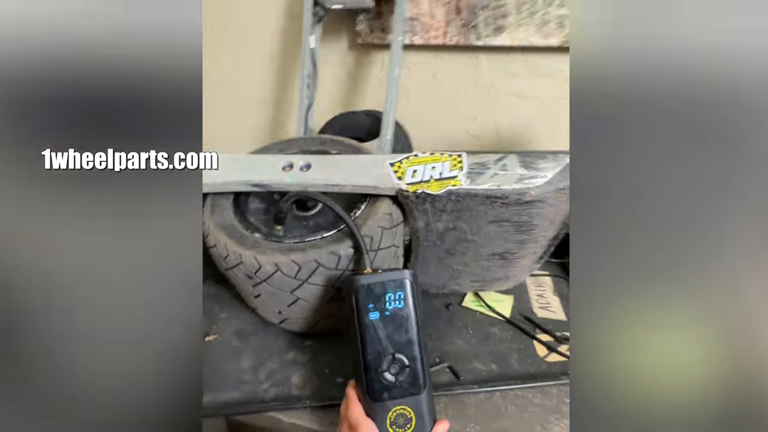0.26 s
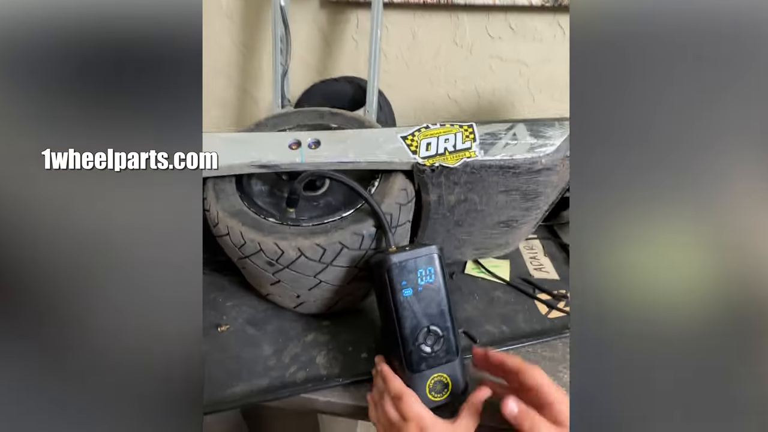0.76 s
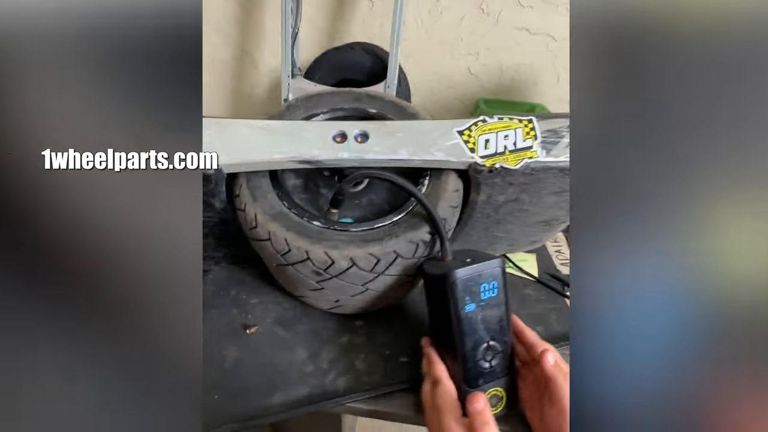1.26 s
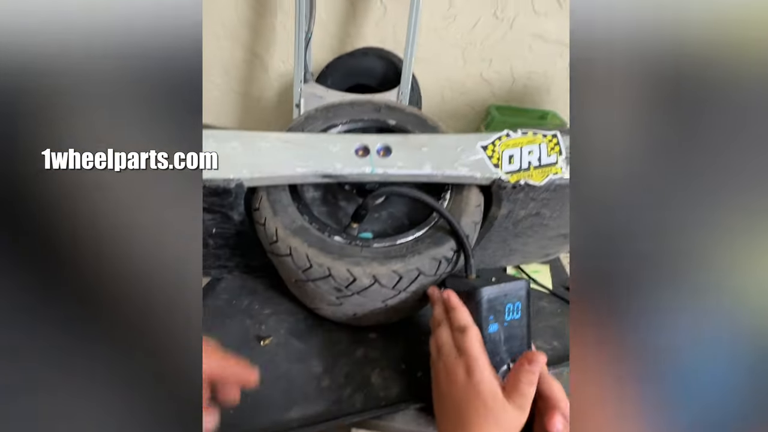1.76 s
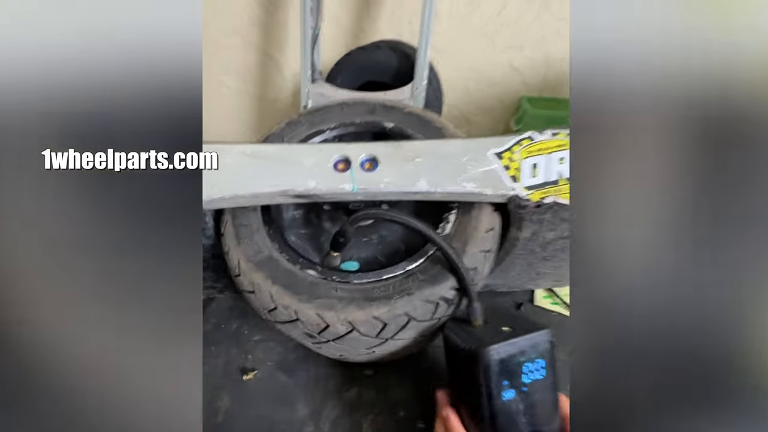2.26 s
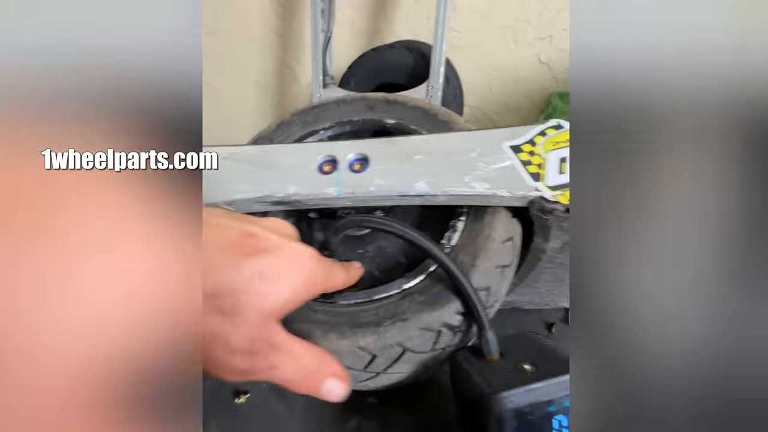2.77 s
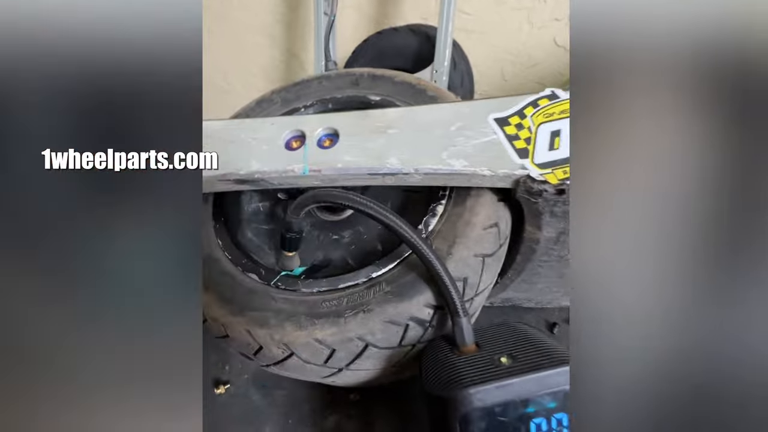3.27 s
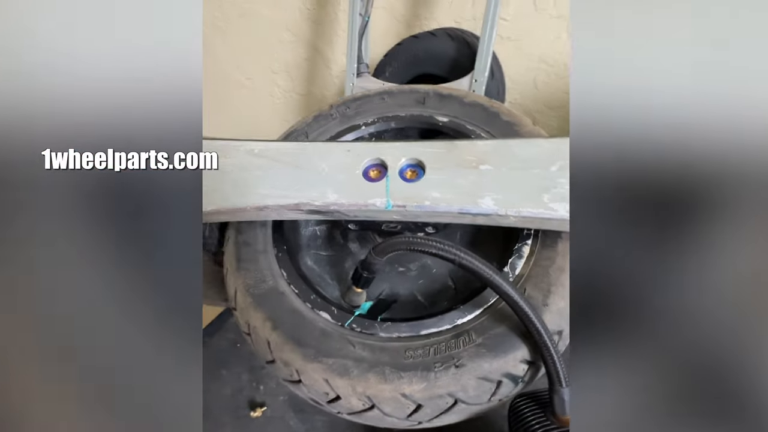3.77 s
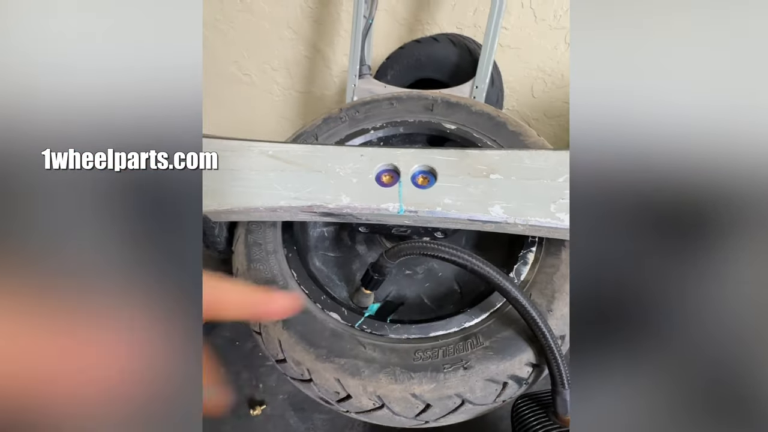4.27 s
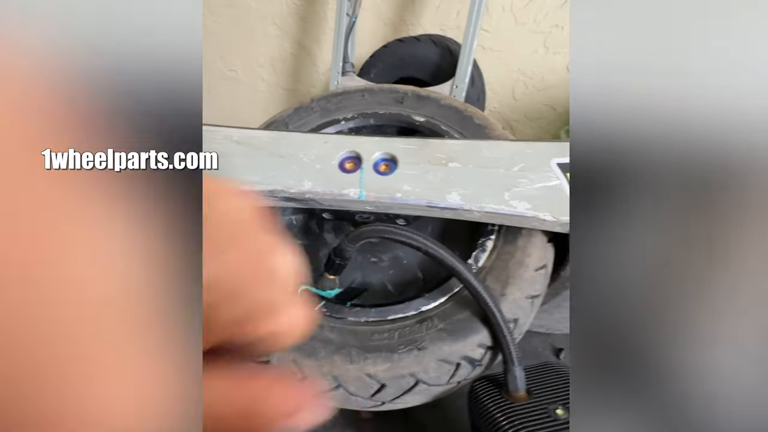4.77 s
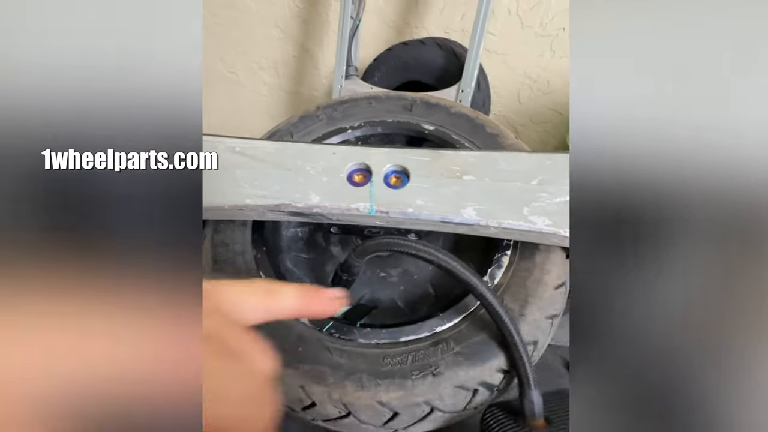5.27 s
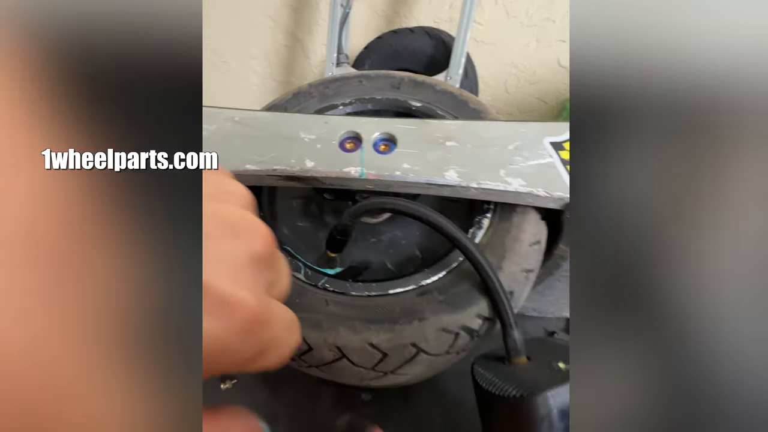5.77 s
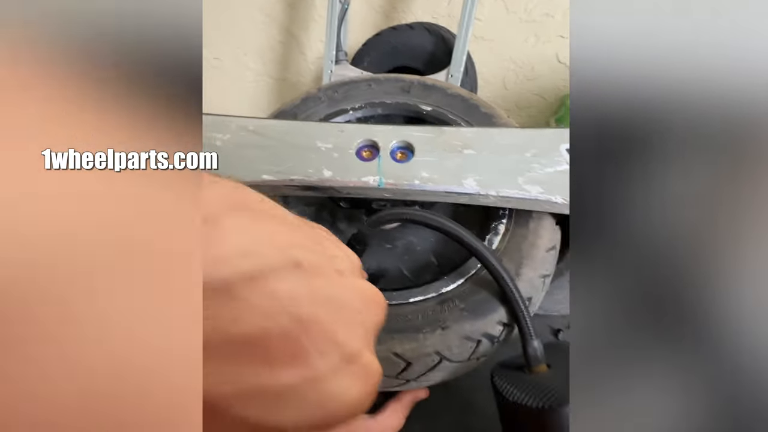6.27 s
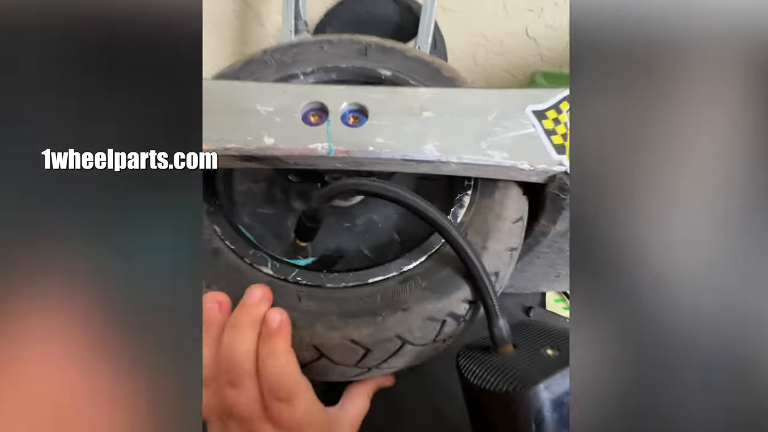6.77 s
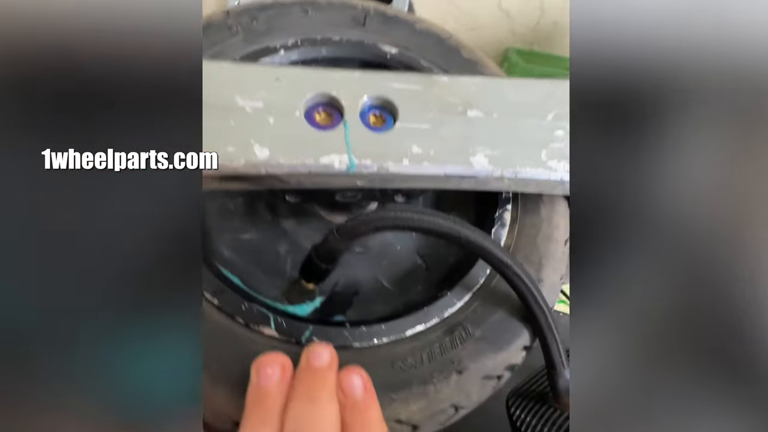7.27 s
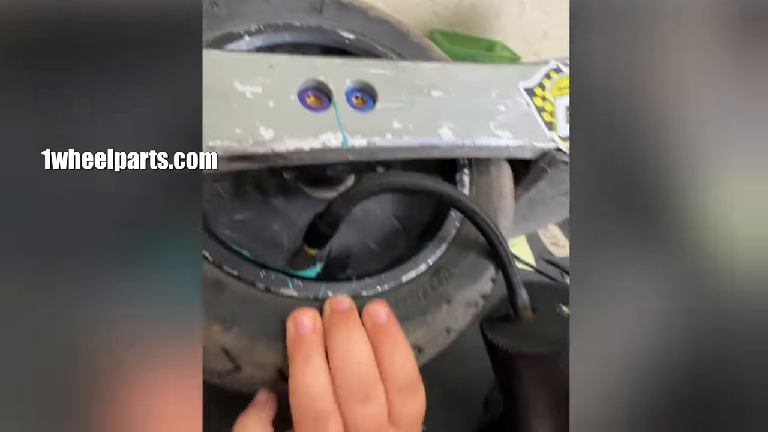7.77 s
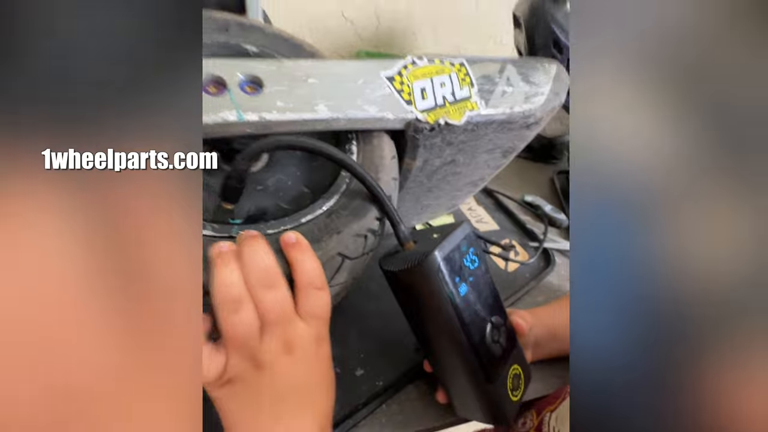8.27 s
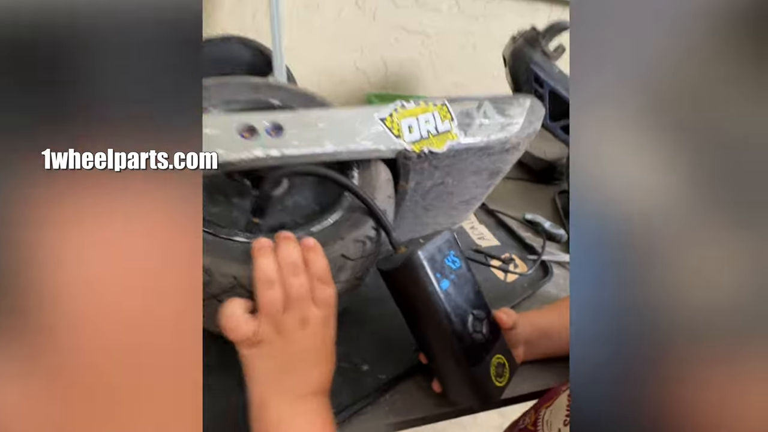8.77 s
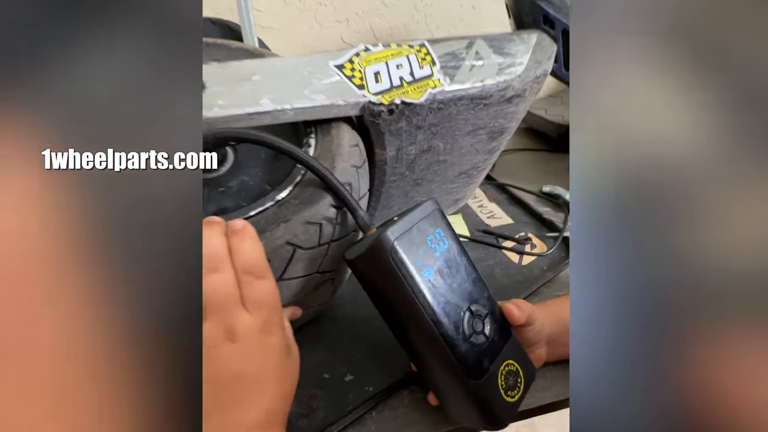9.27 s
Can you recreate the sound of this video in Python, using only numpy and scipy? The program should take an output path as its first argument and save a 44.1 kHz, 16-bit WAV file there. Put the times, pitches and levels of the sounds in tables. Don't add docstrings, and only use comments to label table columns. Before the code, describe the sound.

A small hand-held piston tyre pump runs throughout, close to a phone microphone indoors, already at full speed at the start and still going at the end, about 9.5 seconds. Some 45 strokes a second fuse into a coarse, buzzing rattle, with a strong nasal gear whine around 1.8 kHz, a fainter whine an octave higher, plastic housing ring near 1 kHz and bright valve hiss pulsing with each stroke. From 0 to 2.6 it hums and drums into the workbench, with faint scuffs around 1.4 and 2; then it lifts and the low drumming thins. It rests again from 3.7 to 4.9, deepest after 4.3, with a dull bump near 4.5. Afterwards it stays in the hand, whine and hiss shifting gently as it turns, brief airy glints passing around 6 to 8.3. Pitch sags only slightly as pressure builds.

```python
import sys
import numpy as np
from scipy import signal
from scipy.fft import rfft, irfft, next_fast_len
from scipy.io import wavfile

SR = 44100
rng = np.random.default_rng(int(sys.argv[2]) if len(sys.argv) > 2 else 0)


def unload_audio(sound):
    columns = np.transpose(np.atleast_2d(sound))
    steps = np.round(np.clip(columns, -1, 1) * 32767)
    wavfile.write(sys.argv[1], SR, steps.astype(np.int16))


def field_ratio(decibels):
    return 10 ** (np.asarray(decibels, dtype=float) / 20)


N = 419391

# time in seconds, speed in strokes per second.
CRANK_SPEED = [(0, 46.14), (1, 45.962), (1.5, 45.818), (2, 45.745), (2.5, 45.644), (3, 45.477),
               (3.5, 45.448), (4, 45.396), (4.5, 45.16), (5, 45.188), (5.5, 45.047), (6, 45.032),
               (6.5, 44.95), (7, 44.793), (8, 44.715), (8.5, 44.622), (9, 44.594), (9.51, 44.495)]
# multiple of crank speed, level in dB.
STROKE_HUM = [(1, -36), (2, -16), (3, -16.5), (4, -6), (5, -47.5), (6, -7.5), (7, -27), (8, -5.5),
              (9, -7.5), (10, 1.5), (11, -1), (12, -4.5), (13, -15.5)]
# multiple of crank speed, level in dB.
BENCH_HUM = [(3, -2), (5, -2.5)]
# motor turns, crank turns (both rounded), level in dB.
SHAFT_WOBBLE = [(1, -4.5, -76), (1, 3, -68), (1, 27, -86), (1, 6.5, -72), (1, -4, -82), (2, 6.5, -70),
                (3, 3, -62), (4, 4.5, -101)]

# centre in Hz, width in Hz, share of scraping hiss in dB.
PANEL_MODES = [(699, 140, -1), (826, 258, 3.5), (973, 120, 5.5), (1012, 200, -9.5)]
CYLINDER_MODES = [(1417, 580, 0), (1557, 92, 0.0051)]
MESH_MODES = [(1704, 220, -20), (1782, 350, -7.5)]
SECOND_MODES = [(3496, 630, 2.1), (3830, 520, 1.6)]
CAN_MODES = [(10300, 360, 1), (10780, 440, 3)]

# frequency in Hz, level in dB per Hz.
HISS_COLOUR = [(1500, -3), (1950, -12), (2300, -8.5), (3200, -14.5), (4100, -21), (4700, -20), (5500, -23),
               (6400, -17), (8500, -14.5), (9600, -14), (11000, -3.5), (11800, -4), (15000, -2.5),
               (16500, -18)]
BODY_COLOUR = [(30, -60), (60, -58), (150, -44), (300, -20), (500, -11), (650, -3), (1200, 0), (2000, -5.5),
               (2600, -19)]
# low edge in Hz, high edge in Hz.
HISS_EDGES = [(1700, 3700), (3700, 5600), (5600, 9800), (9800, 16500)]
# one width in Hz each, then one level against the hiss in dB each.
CAVITY_WIDTHS = [580, 230, 930]
CAVITY_SHARES = [-8, -9.5, -8]
# multiple of tooth rate, level in dB.
TOOTH_STREAKS = [(2.45, -66), (2.8, -67), (3, -67), (4, -67), (5, -66)]

# time in seconds, level in dB, length in seconds.
BUMPS = [
    (1.4, -71, .04),
    (1.98, -67, .03),
    (2.5, -66, .07),
    (3.7, -68, .03),
    (4.484, -56, 0.032),
    (4.8, -70, 0.031),
]
# start in seconds, end in seconds, deep drumming in dB, upper drumming in dB.
RESTS = [
    (-.2, 2.1, -77, -59),
    (2.1, 2.63, -73, -58),
    (3.66, 4.32, -74, -60),
    (4.32, 4.86, -67.5, -60),
]
# time in seconds, turn, roll and tilt in plain units.
GRIP = [(0.0, 1.86, -1.6, 2.5), (0.3, 1.93, -1.5, 1.5), (0.9, 2.3, -0.7, 0.1), (1.5, 1.83, -0.46, -0.87),
        (2.1, 1.9, -1.22, 1.03), (2.7, 0.78, 1.46, -0.8), (3.2, 1.22, 2, -1.34), (3.7, -0.16, 0.97, 0.5),
        (4.2, -0.34, 1.22, 0.25), (4.7, 0.5, 1.27, 0.73), (5.2, -0.7, 0.6, 0.9), (5.8, -1.32, 1.23, -1.07),
        (6.4, -1.17, 1.36, -0.7), (7.05, -2, 0.14, 0.8), (7.6, -1.32, -0.2, -0.3), (8.2, -0.93, 0.5, -1.7),
        (8.8, -0.94, -0.9, -1.1), (9.51, -0.6, -0.3, -2.4)]
# time in seconds, cover about its mean in plain units.
PALM = [(0, 0.1), (.8, -0.1), (2.2, 0.5), (2.9, 0.2), (3.65, 2), (4.4, 0), (5.4, -1.4), (6.2, -1.5),
        (6.8, -.2), (7.7, -0.2), (8.6, -0.1), (9.51, .1)]
# low, middle and high hiss in dB per unit of cover.
PALM_MUFFLE = [1.67, -1.3, -0.1]
# time in seconds, length in seconds, centre in Hz, level in dB.
GLINTS = [(1.5, 0.38, 8150, -55), (2.4, .3, 4960, -61), (2.9, .2, 7200, -62), (4.25, .2, 4950, -57),
          (4.6, .5, 9140, -60), (6.15, 0.23, 4380, -58), (6.8, .35, 6700, -63), (7.65, 0.37, 2195, -50),
          (7.8, .3, 4380, -59), (8.1, .3, 7070, -61), (8.3, .25, 8850, -62), (4.7, .4, 2250, -55)]

# dB at mean grip, dB per unit of turn, of roll, of tilt.
PISTON_AIM = (-46.5, -1, 1.5, 0.8)
PANEL_AIM = (-43, -1.9, -1.1, -0.55)
CYLINDER_AIM = (-45, -2, 3.5, 0.9)
MESH_AIM = (-39.5, -4, -1.36, 1.14)
SECOND_AIM = (-52, 1.5, -0.4, 2.5)
HISS_AIMS = [(-50, -1.17, -0.094, 0.17), (-55, 0.7, .2, 0.27), (-53, 0.6, -0.14, .2)]
CAN_AIM = (-51, -0.8, 0.45, -1.4)
HUM_AIM = (-52.5, .9, 0.6, 0.25)
SIXTH_AIM = (-61, -0.3, 0.65, 0.1)
BEAT_AIM = (-56.5, 2, 4.5, 3.5)
SLOT_AIM = (-64.5, 3, 3.5, 0)
DEEP_AIM = (-72.5, 0.2, 1.5, 1.5)
UPPER_AIM = (-68.5, 0.6, 2.5, .3)

# Hz at mean grip, % per unit of turn, of roll, of tilt.
PANEL_PITCH = (955, -1.3, -3.9, 0.5)
MESH_PITCH = (1825, 1.7, -1.5, -0.3)
SECOND_PITCH = (3660, 1.1, 0.26, 0.13)
CAVITY_PITCHES = [(2387, 6, -4, 3), (4590, -1.5, 0.3, -2.4), (8320, 0.2, 1.9, .6)]

GEAR_TEETH, PINION_TEETH, MOTOR_SLOTS = 40, 11, 3
PEAK_LOAD_TURN = .91
BEAT_ORDER = 11
HELD_CONTACT = .12


def gears(crank):
    shaky = crank + 0.0008 * drift(2.9)
    taps = teeth(shaky)
    out = panel(crank, taps) + cylinder(crank, shaky, taps)
    out += mesh_whine(crank, shaky, taps) + second_whine(crank, shaky, taps)
    return out + body(crank, taps) + air(crank, taps) + overtones(crank)


def teeth(crank):
    mesh = GEAR_TEETH * crank + 0.872 * np.sin(2 * np.pi * (crank - PEAK_LOAD_TURN) + 0.757)
    tooth = np.floor(mesh - np.floor(mesh.min())).astype(int)
    strength = 1 + 0.45 * rng.standard_normal(tooth.max() + 1)[tooth]
    strength += 2.76 * rng.standard_normal(GEAR_TEETH)[tooth % GEAR_TEETH]
    strength += 0.51 * rng.standard_normal(PINION_TEETH)[tooth % PINION_TEETH]
    return strength * np.exp(-14 * (1 + np.cos(2 * np.pi * mesh)))


def load(crank, depth_db, late=0.):
    angle = 2 * np.pi * (crank - PEAK_LOAD_TURN - late)
    shape = np.cos(angle) + 0.52 * np.cos(2 * angle + 0.13) + 0.64 * np.cos(3 * angle + 0.32)
    return field_ratio(depth_db * shape)


def panel(crank, taps):
    level_db = aimed(PANEL_AIM)
    out = field_ratio(aimed(PISTON_AIM) - 1.2) * tone(17 * crank, wander_db=.6)
    out += field_ratio(level_db - 3.0) * housing(taps, load(crank, 3.7, late=0.05), PANEL_MODES, flicker_db=-1.0)
    ring = burst(crank, (18, 26), slid(PANEL_PITCH), 77, late=0.031, glide=0.014, wander_db=1.2)
    return out + field_ratio(level_db - 3.5) * ring


def cylinder(crank, shaky, taps):
    level_db = aimed(CYLINDER_AIM)
    out = field_ratio(level_db - 5) * tone(34 * shaky, wander_db=1.2)
    out += field_ratio(level_db - 4) * housing(taps, load(crank, 3, late=.05), CYLINDER_MODES, flicker_db=1.1)
    ring = burst(shaky, (31, 37), 1533, 88, late=0.1003, glide=0.034, wander_db=-1.3)
    return out + field_ratio(level_db - 5.5) * ring


def mesh_whine(crank, shaky, taps):
    level_db = aimed(MESH_AIM)
    rattle = housing(taps, load(crank, 3.5, late=-.06), MESH_MODES, flicker_db=1.2)
    whine = burst(shaky, (36, 43), slid(MESH_PITCH), 85, late=-.12, glide=.028, wander_db=1.2)
    return field_ratio(level_db - 1.5) * whine - field_ratio(level_db - 9) * rattle


def second_whine(crank, shaky, taps):
    level_db = aimed(SECOND_AIM)
    rattle = housing(taps, load(crank, 2.2, late=-.07), SECOND_MODES, flicker_db=1.2)
    whine = burst(shaky, (75, 87), slid(SECOND_PITCH), 120, late=-.12, glide=0.027, wander_db=4.0)
    return field_ratio(level_db - 7) * rattle + field_ratio(level_db - 5) * whine


def body(crank, taps):
    rumble = rng.standard_normal(N) + 0.043 * clatter(taps)
    return field_ratio(-46.5) * coloured(load(crank, 0.23) * rumble, BODY_COLOUR)


def clatter(taps):
    return rms_one(np.diff(taps, prepend=0))


def housing(taps, force, modes, flicker_db):
    out = 0
    for k, (hz, width, hiss_db) in enumerate(modes):
        scrape = resonate(force * rng.standard_normal(N), hz, width)
        ring = resonate(force * taps, hz, width) + field_ratio(hiss_db) * scrape
        out = out + (-1) ** k * ring * field_ratio(flicker_db * drift(2.8))
    return rms_one(out)


def burst(crank, span, centre_hz, width_hz, late, glide, wander_db):
    speed = np.gradient(crank) * SR
    out, power = 0, 1e-9
    for k in range(*span):
        weight = np.exp(-.5 * ((k * speed - centre_hz) / width_hz) ** 2)
        lag = glide * (k - np.mean(span)) ** 2 + .04 * drift(1.0)
        out = out + weight * tone(k * (crank - PEAK_LOAD_TURN - late) + lag, wander_db)
        power = power + weight ** 2
    return out / np.sqrt(power)


def air(crank, taps):
    palm, = in_time(PALM)
    hiss_db = [aimed(row) + muffle * palm for row, muffle in zip(HISS_AIMS, PALM_MUFFLE)]
    gust = load(crank, 1.05) * field_ratio(0.38 * drift(200))
    hiss = coloured(gust * (rng.standard_normal(N) + 0.33 * clatter(taps)), HISS_COLOUR)
    can_force = load(crank, 3.3, late=-.01)
    out = field_ratio(aimed(CAN_AIM) - 2.0) * housing(taps, can_force, CAN_MODES, flicker_db=0.5)
    for level_db, edges in zip(hiss_db + [-56], HISS_EDGES):
        out += field_ratio(level_db - 0.5 + 1.4 * drift(100)) * band(hiss, edges, order=3)
    return out + cavities(crank, hiss_db)


def cavities(crank, hiss_db):
    out = 0
    for level_db, pitch, width, share_db in zip(hiss_db, CAVITY_PITCHES, CAVITY_WIDTHS, CAVITY_SHARES):
        lowpass = signal.butter(2, width, fs=SR, output="sos")
        slow = signal.sosfilt(lowpass, rng.standard_normal((2, N)))
        turn = 2 * np.pi * np.cumsum(slid(pitch)) / SR
        noise = slow[0] * np.cos(turn) + slow[1] * np.sin(turn)
        out = out + field_ratio(level_db + share_db) * rms_one(load(crank, 3.5) * noise)
    return out


def overtones(crank):
    out = 0
    for k, db in TOOTH_STREAKS:
        turns = k * GEAR_TEETH * crank + .4 * drift(60)
        out = out + field_ratio(db) * tone(turns, wander_db=3)
    return out * rms_one(load(crank, 3.7, late=-.05))


def glints(crank):
    air_flow = load(crank, 3.1) * rng.standard_normal(N)
    return sum(swell(at, length, db) * resonate(air_flow, hz, 0.065 * hz) for at, length, hz, db in GLINTS)


def hum(crank):
    motor = crank * GEAR_TEETH / PINION_TEETH
    stack = [row for row in STROKE_HUM[6:] if round(row[0]) != BEAT_ORDER]
    out = field_ratio(aimed(HUM_AIM) + 0.65) * orders(crank, stack, wander_db=0.2)
    out += field_ratio(-93) * tone(crank, wander_db=1.5)
    out += field_ratio(-78) * tone(4 * crank, wander_db=.8)
    out += field_ratio(aimed(SIXTH_AIM)) * tone(6 * crank, wander_db=.6)
    out += field_ratio(aimed(BEAT_AIM)) * tone(BEAT_ORDER * crank, wander_db=.3)
    out += field_ratio(aimed(SLOT_AIM)) * tone(MOTOR_SLOTS * motor + .6, wander_db=.3)
    for m, c, db in SHAFT_WOBBLE:
        out += field_ratio(db) * tone(round(m) * motor + round(c) * crank + .3, wander_db=-0.5)
    return out + drumming(crank, motor)


def drumming(crank, motor):
    contact, deep_db, upper_db = bench()
    thud = band(rng.standard_normal(N), [45, 120])
    rattle = band(rng.standard_normal(N), [120, 810])
    wobble = tone(motor + crank, wander_db=1.5) + tone(motor, wander_db=1.5)
    deep = tone(2 * crank, wander_db=-0.5) + field_ratio(-14) * contact * thud
    upper = orders(crank, BENCH_HUM, wander_db=1.5)
    upper += contact * (field_ratio(-4.0) * rattle + field_ratio(-8) * wobble)
    return field_ratio(deep_db - 0.5) * deep + field_ratio(upper_db - 1.0) * upper


def bench():
    s = np.arange(N) / SR
    chatter_db = 1.5 * np.array([drift(4), drift(4)])
    held = np.array([aimed(DEEP_AIM), aimed(UPPER_AIM)])
    levels, contact = held.copy(), HELD_CONTACT
    for start, end, *rest_db in RESTS:
        down = (np.tanh((s - start) / .02) - np.tanh((s - end) / .02)) / 2
        levels += down * (np.array(rest_db)[:, None] + chatter_db - held)
        contact = contact + (1 - HELD_CONTACT) * down
    return contact, *levels


def bumps():
    swells = sum(swell(at, length, db) for at, db, length in BUMPS)
    return swells * band(rng.standard_normal(N), [50, 230])


def aimed(row):
    return row[0] + np.dot(row[1:], in_time(GRIP))


def slid(row):
    return row[0] * (1 + np.dot(row[1:], in_time(GRIP)) / 100)


def tone(turns, wander_db):
    return np.sqrt(2) * np.cos(2 * np.pi * turns) * field_ratio(wander_db * drift(1.82))


def orders(crank, table, wander_db):
    return rms_one(sum(field_ratio(db) * tone(round(k) * crank + rng.random(), wander_db) for k, db in table))


def swell(at, length, db):
    return field_ratio(db) * np.exp(-.5 * ((np.arange(N) / SR - at) / length) ** 2)


def resonate(x, hz, width):
    r = np.exp(-np.pi * width / SR)
    b, a = [1, 0, -1.058], [1, -2 * r * np.cos(2 * np.pi * hz / SR), r * r]
    return rms_one(signal.lfilter(b, a, signal.lfilter(b, a, x)))


def band(x, edges, order=2):
    return rms_one(signal.sosfilt(signal.butter(order, edges, "band", fs=SR, output="sos"), x))


def coloured(x, spectrum):
    size = next_fast_len(N)
    hz = np.arange(size // 2 + 1) * SR / size + 1
    points = np.array(spectrum)
    gain = field_ratio(np.interp(np.log(hz), np.log(points[:, 0]), points[:, 1], left=-70, right=-70))
    return rms_one(irfft(rfft(x, size) * gain, size)[:N])


def drift(rate):
    r = np.exp(-80 * np.pi * rate / SR)
    noise = rng.standard_normal(N // 40 + 2002)
    slow = signal.lfilter([1], [1, -2 * r, r * r], noise)[2000:]
    return np.interp(np.arange(N) / 40, np.arange(len(slow)), rms_one(slow))


def in_time(rows):
    s, *columns = np.transpose(rows)
    return [np.interp(np.arange(N) / SR, s, c) for c in columns]


def rms_one(x):
    return x / np.sqrt(np.mean(x ** 2) + 1e-20)


def scene():
    crank = np.cumsum(in_time(CRANK_SPEED)[0]) / SR
    return (gears(crank) + glints(crank) + hum(crank) + bumps())[None]


def band_limit(x):
    return signal.sosfilt(signal.butter(12, 16020, fs=SR, output="sos"), x)


def record(dry):
    dry = signal.sosfilt(signal.butter(2, 40, "high", fs=SR, output="sos"), dry)
    dry = signal.sosfilt(signal.ellip(12, .3, 70, 15740, fs=SR, output="sos"), dry)
    return band_limit(dry)


dry = scene()
out = record(dry)
unload_audio(out)
```